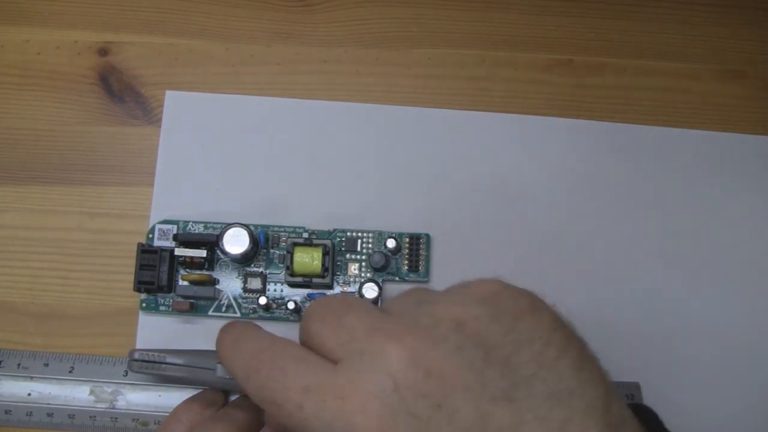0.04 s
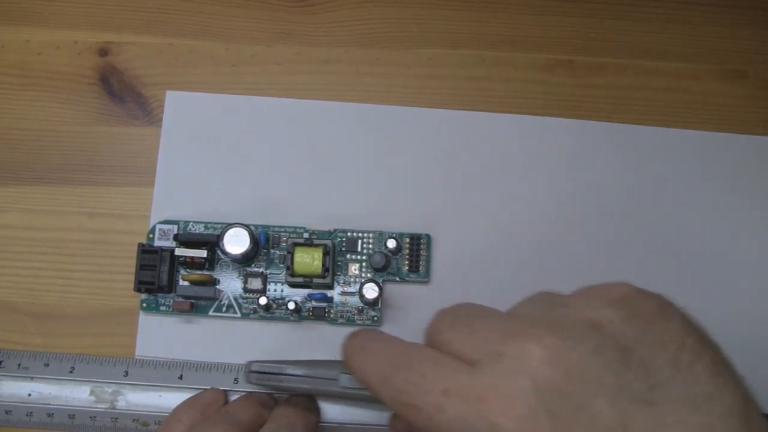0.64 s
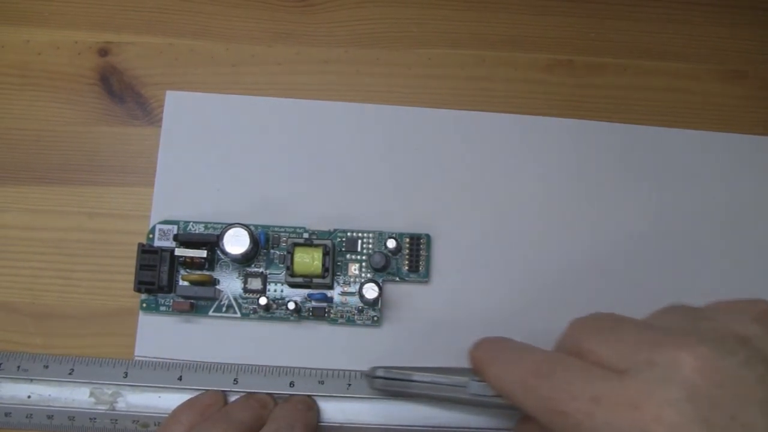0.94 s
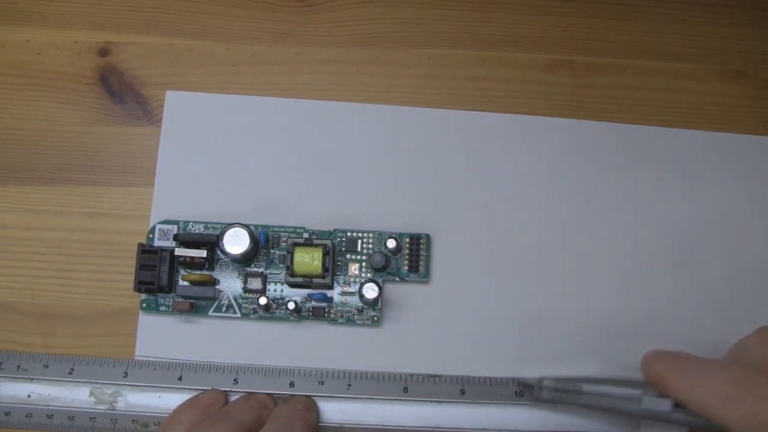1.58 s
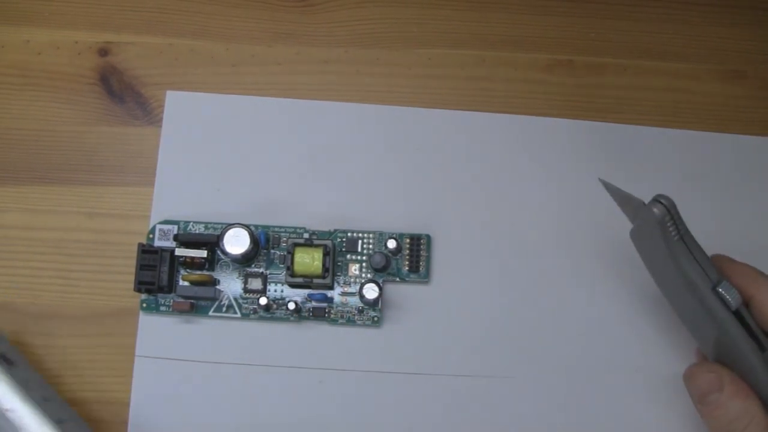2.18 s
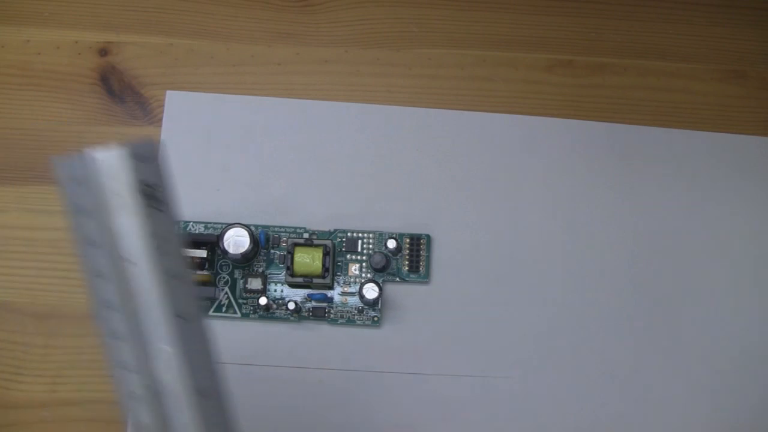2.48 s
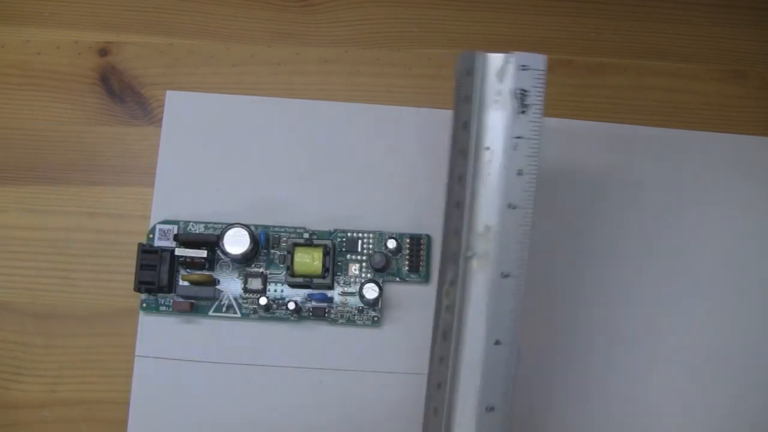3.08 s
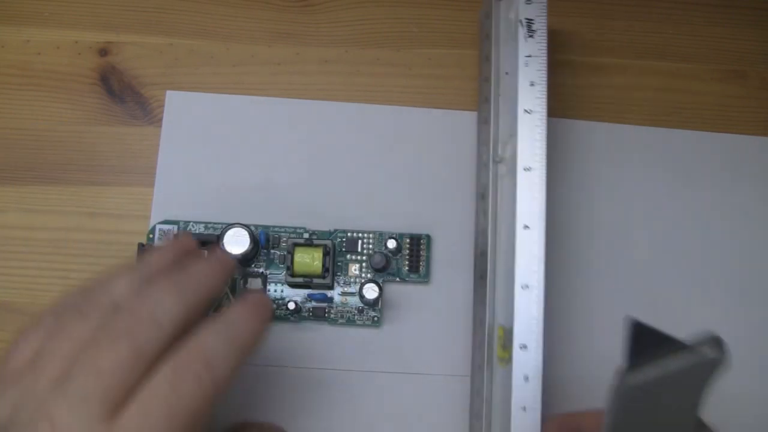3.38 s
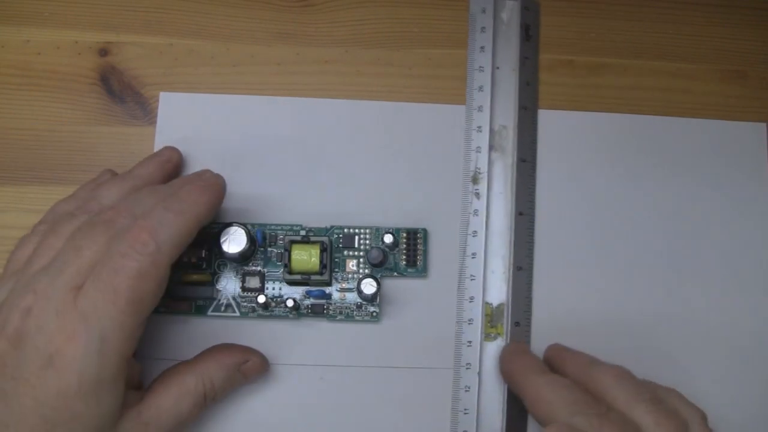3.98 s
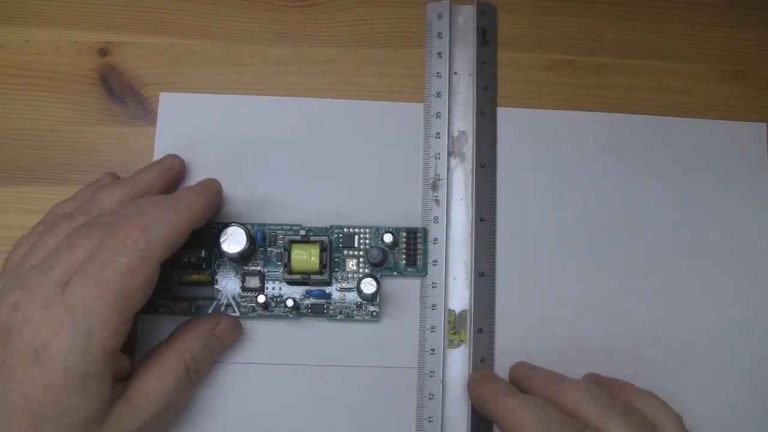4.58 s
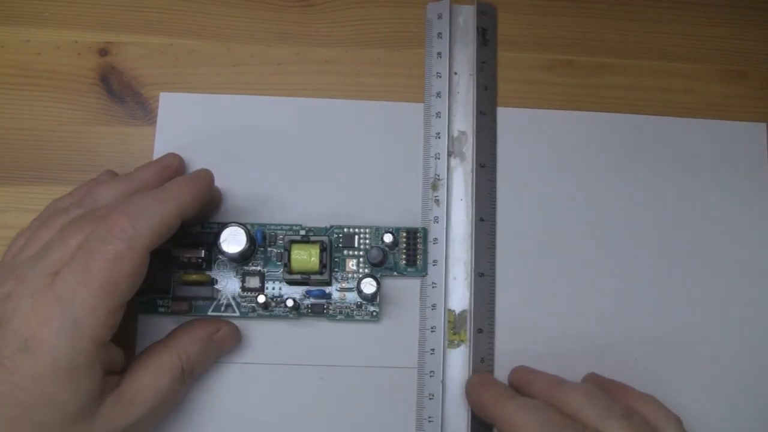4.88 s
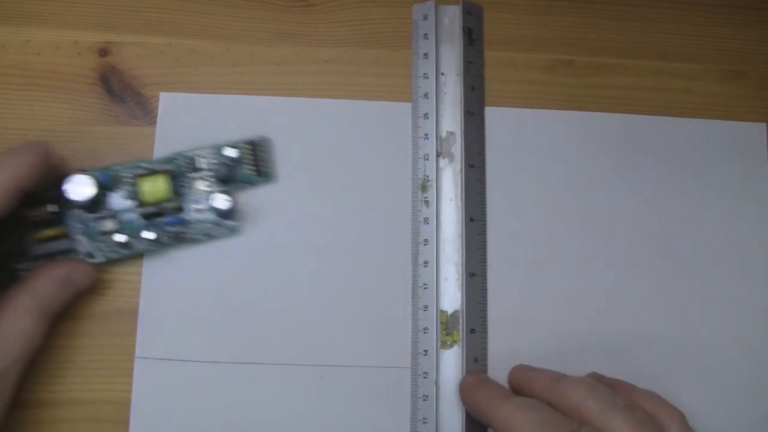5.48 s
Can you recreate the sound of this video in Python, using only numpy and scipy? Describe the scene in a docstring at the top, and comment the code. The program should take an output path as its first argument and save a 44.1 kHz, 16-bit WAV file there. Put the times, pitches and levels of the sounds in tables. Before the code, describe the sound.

A craft knife taps lightly, then hisses along a metal ruler through card on a wooden table, ending in a sharp click. The ruler scrapes away, ringing, and a string of small metallic ticks follows. A quick cluster of knocks, the loudest sound, comes as the knife lands on the table. Brief scuffs and the soft slide of a circuit board finish it. The microphone is close, in a small quiet room.

```python
"""A craft knife scores card along an aluminium ruler on a wooden table, close by in a small room.
Snapping fibres hiss and drive the modes of blade and table; stick-slip adds brief squeaks.
The ruler is dragged off, ringing, and turned while the loose knife ticks; the knife is put down
with a clatter. The ruler is nudged into place and a circuit board slides away over the card.
The table rumbles under the hands, over faint air and hum."""
import sys
import numpy as np
from scipy import signal
from scipy.fft import rfft, irfft, next_fast_len
from scipy.io import wavfile
from scipy.ndimage import map_coordinates

SR = 44100
rng = np.random.default_rng(int(sys.argv[2]) if len(sys.argv) > 2 else 0)


def generate_wav(signal):
    """Clip the signal to [-1, 1] and save it as 16-bit WAV at the path in sys.argv[1]."""
    frames = np.transpose(np.atleast_2d(signal))
    scaled = np.clip(frames, -1, 1) * 32767
    pcm = np.round(scaled).astype(np.int16)
    wavfile.write(sys.argv[1], SR, pcm)


N = 253365
TIME = np.arange(N) / SR
AGE = TIME[:SR // 2]  # seconds since an impact

# impact bands (thump, wood, clack, edge): low_hz, high_hz
BANDS = [(40, 320), (320, 1400), (1400, 4500), (4500, 16000)]
# light metal contact spectrum: freq_hz, level_db
METAL_SPECTRUM = [(320, -25), (700, -13), (950, -11), (1500, -19), (1900, -4.5), (2250, -3), (3500, 2),
                  (5200, 0), (7000, -5.5), (10500, -16.5), (15500, -42)]
# free ruler modes: freq_hz, width_hz, level_db
RULER_MODES = [(1723, 36, -23), (2414, 50, -8), (2710, 27, -19), (2890, 69, -3.5), (3040, 15, -12),
               (3884, 31, 4.5), (4805, 42, 5), (5460, 79, -2.5), (5840, 70, -4), (6100, 50, -7),
               (6500, 54, -17), (6930, 89, -7), (6800, 48, -8.5), (7500, 57, -17.5), (8170, 38, -11),
               (9600, 81, -20.5), (10350, 120, -19.5), (10800, 70, -30), (12100, 65, -27), (12800, 57, -17)]
# deep table-top modes: freq_hz, width_hz, level_db
TABLE_LOW_MODES = [(73.4, 18, -1.5), (121.5, 16, -3.5), (177.4, 18.2, -3), (227.7, 22, -2)]


def from_db(db):
    """Decibels to gain."""
    return 10 ** (np.asarray(db) / 20)


def unit_rms(x):
    """Scale to unit power."""
    return x / np.sqrt(np.mean(x ** 2) + 1e-20)


def add(out, start_s, sound):
    """Mix a sound in at start_s."""
    at = max(round(start_s * SR), 0)
    out[at:at + len(sound)] += sound[:N - at]


def decay(t60_s):
    """Exponential fall."""
    return from_db(-60 * AGE / t60_s)


def attack(rise_s):
    """Exponential rise to one."""
    return 1 - np.exp(-AGE / rise_s)


def sine(hz, time_s=AGE):
    """Sine of random phase."""
    return np.sin(2 * np.pi * (hz * time_s + rng.random()))


def coloured(x, spectrum, low_hz=0, high_hz=SR):
    """Band-limit and shape by (freq_hz, level_db) points; unit power."""
    size = next_fast_len(len(x))
    hz = np.maximum(np.fft.rfftfreq(size, 1 / SR), 1)
    points_hz, db = np.transpose(spectrum)
    gain = from_db(np.interp(np.log(hz), np.log(points_hz), db)) * (hz >= low_hz) * (hz < high_hz)
    return unit_rms(irfft(rfft(x, size) * gain, size)[:len(x)])


def resonate(x, hz, width_hz):
    """Two-pole resonator, unit peak gain."""
    r = np.exp(-np.pi * width_hz / SR)
    feedback = [1, -2 * r * np.cos(2 * np.pi * hz / SR), r * r]
    return signal.lfilter(np.array([1, 0, -1]) * (1 - r * r) / 2, feedback, x)


def resonances(x, modes):
    """Driven modes in parallel; unit power."""
    return unit_rms(sum(from_db(db) * resonate(x, hz, width_hz) for hz, width_hz, db in modes))


def rough_tone(hz, width_hz):
    """Noise twice through one resonator; unit power."""
    once = resonate(rng.standard_normal(2 * len(AGE)), hz, width_hz)
    return unit_rms(resonate(once, hz, width_hz)[len(AGE):])


def drift(rate_hz):
    """Random wander; unit power."""
    return unit_rms(np.interp(TIME * rate_hz, np.arange(N), rng.standard_normal(N)))


def waver(x, depth, rate_hz):
    """Pitch wander; depth is the rms fraction."""
    position = np.arange(N) + depth * np.cumsum(drift(rate_hz))
    return map_coordinates(x, [position], order=3, mode="mirror")


def pushes(rows, rise_db_per_s, fall_db_per_s):
    """Gain of hand pushes: each gathers speed, holds and lets go."""
    power = 0
    for start_s, hold_s, db, *_ in rows:
        below_db = np.maximum(rise_db_per_s * (start_s - TIME), fall_db_per_s * (TIME - start_s - hold_s))
        power = power + from_db(db - np.clip(below_db, 0, 120)) ** 2
    return np.sqrt(power)


def friction(snaps_per_s, spread_db):
    """Fibres snap at random: dense, uneven clicks on a smooth hiss."""
    sizes = from_db(spread_db * np.minimum(rng.exponential(1, N), 4)) * rng.choice([-1, 1], N)
    snaps = unit_rms(sizes * (rng.random(N) < snaps_per_s / SR))
    return unit_rms(snaps + rng.standard_normal(N))


def rub(grains, spectrum, contact_db, table_db, tool=0):
    """Friction hisses at the contact and drives the table; a tool's ring joins the hiss."""
    # wooden table modes: freq_hz, width_hz, level_db
    table_modes = [(231, 34, 9), (443, 52, -1.5), (512, 22, 7), (869, 74, 7.5), (987, 18, 1), (1168, 65, 2),
                   (1620, 160, -5), (2430, 170, -22)]
    contact = coloured(grains, spectrum) + tool
    return from_db(contact_db) * contact + from_db(table_db) * resonances(grains, table_modes)


def reach_db(hz, bands, band_db):
    """Impact strength at hz, interpolated between band centres."""
    return np.interp(np.log(hz), np.log(bands).mean(axis=1), band_db)


def impact(bands, band_db, envelopes, spectrum, crack_t60_s):
    """Noise burst: a crack, then crowded modes and near reflections dying band by band."""
    hz, spectrum_db = np.transpose(spectrum)
    tilted = np.transpose([hz, spectrum_db + reach_db(hz, bands, band_db)])
    out = 0
    for db, band, (gain_db, rise_s, t60_s, crack_db) in zip(band_db, bands, envelopes):
        envelope = attack(rise_s) * (decay(t60_s) + from_db(crack_db) * decay(crack_t60_s))
        out += from_db(db + gain_db) * envelope * coloured(rng.standard_normal(len(AGE)), tilted, *band)
    return out


def ringing(modes, bands, band_db, scatter_db):
    """Clear modes of a struck body, with new strengths at each impact."""
    out = 0
    for hz, db, t60_s in modes:
        gain = from_db(reach_db(hz, bands, band_db) + db + scatter_db * rng.normal())
        out += gain * decay(min(t60_s, 0.22)) * sine(hz)
    return out * attack(0.0029)


def room_tone(air_db=-55, side_db=-17, hiss_db=-64.5):
    """Centred air and hum; each side adds its own faint air and hiss."""
    # room air: freq_hz, level_db
    air_spectrum = [(15, -31.5), (25, -9.5), (185, -2), (344, -10), (463, -10.5), (607, -15), (677, -14.5),
                    (796, -16), (1070, -14), (1560, -20.5), (2160, -21.5), (2550, -24), (8830, -29.5),
                    (10400, -34), (16000, -47)]
    # hum partials: freq_hz, rms_db
    partials = [(50, -69.5), (100, -62.5), (199, -65.5), (452, -67.5)]
    hum = sum(np.sqrt(2) * from_db(db) * sine(hz, TIME) for hz, db in partials)
    air, *sides = [from_db(air_db) * coloured(noise, air_spectrum, low_hz=31)
                   for noise in rng.standard_normal((3, N))]
    hiss = from_db(hiss_db) * rng.standard_normal((2, N))
    return air + hum + from_db(side_db) * np.array(sides) + hiss


def room(x, wet_db=-12.5, t60_s=0.27, cutoff_hz=6000):
    """Direct sound plus a short, dull reverberant tail."""
    tail = rng.standard_normal(len(AGE)) * decay(t60_s) * attack(0.0084)
    lowpass = signal.butter(1, cutoff_hz, fs=SR, output="sos")
    response = signal.sosfilt(lowpass, tail / np.linalg.norm(tail))
    return x + from_db(wet_db) * signal.fftconvolve(x, response)[:N]


def hand_rumble(sliding, gain_db=-5, resting_db=-58.5, modes_db=-11.5):
    """The table rumbles as hands rest, lean and slide things along."""
    # leans on the table: start_s, hold_s, level_db
    leans = [(.16, 0.058, -48), (1.09, 0.031, -48), (1.97, 0.16, -44.5), (3.04, 0.018, -54),
             (3.2, 0.22, -60), (3.59, 0.4, -46.5)]
    # rumble: freq_hz, level_db
    spectrum = [(30, -14), (55, 6), (75, 1), (96, 3), (122, 4), (150, -4.5), (178, 3), (228, -0.5),
                (293, -16), (450, -5), (580, -43.5), (990, -120)]
    weight = np.hypot(pushes(leans, rise_db_per_s=112, fall_db_per_s=98), sliding + from_db(resting_db))
    rumble = coloured(rng.standard_normal(N), spectrum, low_hz=49, high_hz=600)
    boom = from_db(modes_db) * resonances(rng.standard_normal(N), TABLE_LOW_MODES)
    return from_db(gain_db) * weight * (rumble + boom)


def judders():
    """Stick-slip: the blade squeaks, the ruler groans, the board croaks and shudders."""
    # catching edges: start_s, length_s, pitch_hz, width_hz, level_db
    catches = [(0.932, .018, 6200, 800, -46), (0.993, 0.0246, 6200, 800, -46),
               (2.075, 0.05, 172.7, 25, -41), (2.15, 0.12, 144.6, 25, -51.5), (5.449, 0.12, 63, 29.5, -49),
               (5.472, 0.025, 880, 197, -44), (5.635, 0.047, 68, 30, -49), (5.711, 0.037, 880, 149, -50.5)]
    out = np.zeros(N)
    for start_s, length_s, hz, width_hz, db in catches:
        window = signal.windows.tukey(round(length_s * SR), 0.25)
        add(out, start_s, from_db(db) * window * unit_rms(rough_tone(hz, width_hz)[:len(window)]))
    return out


def board_slide(effort):
    """The circuit board rubs over the card."""
    # board friction: freq_hz, level_db
    spectrum = [(290, -38), (500, -16), (855, 0), (1020, -17), (1130, -11), (1640, -10), (2850, -7),
                (5310, -5), (11000, -20.5), (16000, -44)]
    return effort * rub(friction(snaps_per_s=2800, spread_db=1.5), spectrum, contact_db=0.7, table_db=-11)


def nudges(effort):
    """Ruler and board scuff in short shoves."""
    # scuff: freq_hz, level_db
    spectrum = [(290, -32), (500, -8.5), (688, -5.5), (1160, 0.5), (1400, -7), (1620, -6), (2190, -7.5),
                (3060, 0), (3390, -5.5), (5970, -8), (16000, -41)]
    grains = friction(snaps_per_s=3400, spread_db=2.5)
    return effort * rub(grains, spectrum, contact_db=-1.1, table_db=-10.5)


def ruler_drag(effort):
    """The ruler scrapes off the card, bright and grainy."""
    # scrape: freq_hz, level_db
    spectrum = [(290, -41), (500, -27), (621, -6), (960, -21), (1060, -23), (1180, -6), (2070, -6.5),
                (2850, -0.5), (4800, 3), (10500, -10.5), (16000, -27)]
    grains = friction(snaps_per_s=4000, spread_db=3.5)
    return effort * rub(grains, spectrum, contact_db=-2.5, table_db=-17)


def ruler_song(shoves, gain_db=-0.45, shove_db=-6.5, wander_db=6.5, hiss_db=-9):
    """Rubs and shoves drive the ruler's modes; a lighter touch favours the high ones."""
    # rubs: start_s, hold_s, level_db, tilt_db_per_octave
    rubs = [(2.061, 0.033, -39, 0), (2.133, 0.044, -44, -6), (2.267, 0.011, -37.5, -12),
            (2.462, .005, -48, -3.5), (2.755, 0.014, -52, 4), (2.851, 0.0091, -40, 5.5),
            (3.152, 0.0088, -47, 2), (3.222, 0.0086, -58.5, 14), (3.619, 0.16, -46.5, -4)]
    start_s, _, _, tilt = np.transpose(rubs)
    effort = pushes(rubs, rise_db_per_s=342, fall_db_per_s=280) + from_db(shove_db) * shoves
    grains = friction(snaps_per_s=1500, spread_db=0.5)
    ring, power = 0, 0
    for hz, width_hz, mode_db in RULER_MODES:
        gain = np.interp(TIME, start_s, from_db(mode_db + tilt * np.log2(hz / 4500)))
        gain *= from_db(wander_db * drift(rate_hz=28))  # moving contact feeds modes by turns
        ring += gain * unit_rms(resonate(grains, hz, width_hz))
        power += gain ** 2
    ring = waver(ring / np.sqrt(power), depth=0.0053, rate_hz=19)  # changing grip bends the pitch
    hiss = from_db(hiss_db) * coloured(grains, METAL_SPECTRUM, low_hz=2000)
    return from_db(gain_db) * effort * (ring + hiss)


def ruler_pings(peak_hz=4060, fall_db_per_octave=14, t60_s=0.088):
    """A jolt rings all the ruler's modes, the middle ones most."""
    # jolts: start_s, level_db
    jolts = [(2.2765, -27.5), (3.026, -43), (3.7964, -31)]
    out = np.zeros(N)
    for start_s, db in jolts:
        for hz, _, mode_db in RULER_MODES:
            gain = from_db(db + mode_db - fall_db_per_octave * abs(np.log2(hz / peak_hz)))
            add(out, start_s, gain * decay(t60_s) * attack(0.0029) * sine(hz))
    return out


def metal_ticks(wood_db=-11, snap_db=-20.5, click_db=-5.5, grip_click_db=22.5, grip_damping=0.68):
    """Knife and ruler touch lightly, and the board touches down once; a firm grip damps the ring and leaves
    mostly the click."""
    # touches: start_s, level_db, bright_db, grip_fraction, ring_hz, ring_db
    touches = [(0.1317, -44.5, 1.5, 0, 3440, -6), (0.1412, -40, -3.5, 0, 3940, -6),
               (0.168, -44.5, -1, 0, 3000, -8), (0.26, -48, -10, 0.2, 2420, -19),
               (0.4305, -46, 5.5, .9, 4750, -21), (1.3398, -40.5, 3.5, 0.15, 4970, -13),
               (1.7077, -39, -5, 0, 2350, -3), (1.7183, -26.5, -3.5, 0, 5130, -7.5),
               (1.7253, -31, -4, .45, 3400, -4), (2.2746, -37.5, -12, 0.2, 915, -6.5),
               (2.523, -40, 0, 0, 2240, 1.5), (2.5777, -35.5, 2.5, .2, 6440, -9),
               (2.645, -45.5, 0.5, 0.4, 3420, -3), (2.6769, -33.5, -4, 0.33, 4970, 1),
               (2.683, -33, 2.5, 0.2, 4930, -16), (2.776, -46.5, 1, 0.4, 5720, -4),
               (2.824, -43, 7, 0.2, 5000, -16), (2.9647, -33.5, -1.5, 0.3, 5130, -13),
               (2.9752, -35.5, 1.5, .4, 5800, -18), (2.9837, -37, 1, 0.45, 3400, -14),
               (3.026, -28, 5, .1, 2710, -10), (3.0482, -31.5, -5, 0.6, 4970, -4),
               (3.3608, -47, -4, 0.68, 2210, -9), (3.3845, -38.5, -13, 0.89, 3610, -3),
               (5.4702, -40.5, -3, 0.64, 880, -2)]
    # ungripped envelopes, wood to edge band: gain_db, rise_s, t60_s, crack_db
    envelopes = [(-9.5, 0.0016, 0.13, -3), (-8, 0.0006, 0.18, -5), (-11, 0.00032, 0.17, 5.5)]
    # small metal parts, ungripped: freq_hz, level_db, t60_s
    metal_modes = [(2254, -12.5, 0.15), (2450, -10, 0.14), (2730, -16, 0.29), (3340, -9, 0.084),
                   (4380, -14, .13), (5210, -21, 0.22), (6150, -28, 0.089), (7000, -20, 0.13),
                   (10800, -30, 0.06), (10300, -16, 0.094), (13000, -29, 0.075)]
    # snap of hard edges: freq_hz, level_db
    snap_spectrum = [(500, 0), (10500, -1), (16000, -12)]
    bands = BANDS[1:]  # no thump
    out = np.zeros(N)
    for start_s, db, bright_db, grip, ring_hz, ring_db in touches:
        sustain = np.clip(1 - grip_damping * grip, 0.2, 1.2)
        band_db = [db + wood_db, db, db + bright_db]
        damped = np.array(envelopes) * [1, 1, sustain, 1]
        modes = np.array(metal_modes) * [1, 1, sustain]
        modes[:, 0] *= 1 + 0.0141 * rng.standard_normal(len(modes))  # contact point shifts the modes
        sound = impact(bands, band_db, damped, METAL_SPECTRUM, crack_t60_s=0.011)
        sound += ringing(modes, bands, band_db, scatter_db=1.0)
        ring = rough_tone(ring_hz, width_hz=410) * decay(0.11 * sustain)
        sound += from_db(max(band_db) + ring_db) * ring
        snap = decay(0.046) * coloured(rng.standard_normal(len(AGE)), snap_spectrum)
        sound += from_db(db + bright_db + snap_db) * snap
        click = decay(9 / ring_hz) * np.sin(2 * np.pi * ring_hz * AGE)  # dies in nine cycles
        sound += from_db(db + click_db + grip_click_db * grip) * click
        add(out, start_s, sound)
    return out


def table_knocks(modes_db=-2.5, thump_db=8, ring_t60_at_1khz_s=0.14):
    """Things hit the table, loudest the knife put down: clack, ringing modes, thump."""
    # blows: start_s, thump_db, wood_db, clack_db, edge_db, ring_hz, ring_db
    blows = [(0.353, -39, -38, -40.5, -44.5, 6600, -2), (0.3785, -40.5, -60, -68, -71, 500, -8),
             (0.719, -48, -41.5, -38, -35.5, 6500, -7), (3.577, -49, -28, -24.5, -29, 500, -4),
             (3.6357, -42, -33, -27, -35.5, 600, -8), (3.6668, -30.5, -22.5, -24, -43, 1760, -0.5),
             (3.7949, -30, -14, -11, -11.5, 890, -7), (3.9501, -33.5, -27, -33, -35.5, 788, -3.5)]
    # envelope per band: gain_db, rise_s, t60_s, crack_db
    envelopes = [(7.5, 0.055, 0.19, -23), (-5, 0.00075, 0.16, -9), (-3, 0.0018, 0.18, -20),
                 (-7.5, 0.00022, 0.17, 9)]
    # clack: freq_hz, level_db
    spectrum = [(24, -47), (40, -17), (75, -5), (382, -6.5), (503, -15.5), (646, -7.5), (873, -3),
                (1300, -7), (1680, -6), (2100, -9), (2380, -6.5), (3830, -4.5), (9450, -22), (12500, -38),
                (16000, -60.5)]
    # knife on the table top: freq_hz, level_db, t60_s
    modes = [(442.5, -8, 0.2), (500, -6, 0.14), (846, 3.5, 0.052), (966, -7, 0.087), (1113, -2, 0.043),
             (1623, -10.5, .17), (1761, -17, 0.11), (2275, -10, 0.15), (2488, -2, 0.049),
             (2416, -8.5, 0.15), (2590, -18, 0.15), (3190, -14, 0.16), (3590, -17, 0.13),
             (3540, -10.5, 0.11), (3870, -14, 0.12), (4030, -6, 0.091), (4340, -42, 0.078),
             (5060, -30, 0.2), (5290, -46, 0.148), (5640, -17.5, 0.24), (6300, -7, 0.077), (6620, -10, .07),
             (8250, -29, 0.11)]
    out = np.zeros(N)
    for start_s, *band_db, ring_hz, ring_db in blows:
        sound = impact(BANDS, band_db, envelopes, spectrum, crack_t60_s=0.0089)
        sound += from_db(modes_db) * ringing(modes, BANDS, band_db, scatter_db=1.9)
        # the landing spot picks one resonance; high ones are broad and brief
        ring = decay(ring_t60_at_1khz_s * np.sqrt(1000 / ring_hz)) * rough_tone(ring_hz, 0.16 * ring_hz)
        sound += from_db(reach_db(ring_hz, BANDS, band_db) + ring_db) * ring
        for hz, width_hz, db in TABLE_LOW_MODES:
            swell = np.exp(-np.pi * width_hz * AGE) * attack(0.019)  # the heavy top answers late
            sound += from_db(band_db[0] + db + thump_db) * swell * sine(hz)
        add(out, start_s, sound)
    return out


def blade_pressure(fade_s=0.01):
    """Gain through the one long cut, zero outside it."""
    # pressure on the blade: time_s, level_db
    curve = [(0.5, -73), (0.55, -59), (0.74, -52.5), (1.1, -49.5), (1.29, -55.5), (1.43, -54.5),
             (1.565, -50), (1.66, -76)]
    time_s, db = np.transpose(curve)
    gate = np.interp(TIME, [time_s[0] - fade_s, time_s[0], time_s[-1], time_s[-1] + fade_s], [0, 1, 1, 0])
    return from_db(np.interp(TIME, time_s, db)) * gate


def knife_cut(pressure, blade_db=-3):
    """The blade snaps card fibres; its resonances shift as its bite changes."""
    # cutting hiss: freq_hz, level_db
    spectrum = [(290, -17), (500, -8), (604, -9), (678, 1.5), (750, -13), (843, -24), (1420, -30),
                (2100, -8.5), (4800, -6.5), (6140, -10), (7420, -14), (16000, -40)]
    # knife modes: freq_hz, width_hz, level_db
    blade_modes = [(2100, 80, -5), (3150, 170, -1.5), (3700, 92, -11), (4400, 150, 2), (5320, 170, 5),
                   (5990, 48, 7.5), (6260, 90, 3), (6800, 54, -8), (8000, 82, -8)]
    grains = friction(snaps_per_s=1300, spread_db=1.0)
    blade = from_db(blade_db) * waver(resonances(grains, blade_modes), depth=0.012, rate_hz=9)
    return pressure * rub(grains, spectrum, contact_db=-1.6, table_db=-1.5, tool=blade)


def scene():
    """All action on the table straight ahead, over stereo room tone."""
    # ruler dragged off: start_s, hold_s, level_db
    drags = [(1.912, 0.053, -33), (2.06, 0.074, -40.5), (2.15, 0.13, -46.5)]
    # ruler and board shoved: start_s, hold_s, level_db
    shoves = [(2.465, 0.0045, -60), (4.08, .025, -43), (4.17, 0.02, -46.5), (4.25, 0.028, -38),
              (4.472, 0.0076, -49.5), (4.53, 0.018, -53.5), (4.655, 0.019, -53), (5.13, 0.012, -60),
              (5.21, 0.013, -58.5), (5.275, 0.0087, -58.5)]
    # board pulled away: start_s, hold_s, level_db
    pulls = [(5.4, 0.032, -51), (5.475, 0.031, -51), (5.55, 0.038, -56.5), (5.625, 0.13, -47.5)]
    cutting = blade_pressure()
    dragging = pushes(drags, rise_db_per_s=395, fall_db_per_s=140)
    nudging = pushes(shoves, rise_db_per_s=284, fall_db_per_s=322)
    pulling = pushes(pulls, rise_db_per_s=262, fall_db_per_s=260)
    strokes = knife_cut(cutting) + ruler_drag(dragging) + nudges(nudging) + board_slide(pulling)
    impacts = table_knocks() + metal_ticks()
    ruler = ruler_song(nudging) + ruler_pings()
    rumble = hand_rumble(from_db(3) * cutting + pulling)
    return room(strokes + impacts + ruler + rumble + judders()) + room_tone()


def record(dry):
    """Soft peak limiting, then a steep low-pass."""
    ceiling, cutoff_hz = 0.85, 15900
    rounded = ceiling * np.tanh(dry / ceiling)
    return signal.sosfilt(signal.ellip(10, 0.1, 80, cutoff_hz, fs=SR, output="sos"), rounded)


dry = scene()
out = record(dry)
generate_wav(out)
```